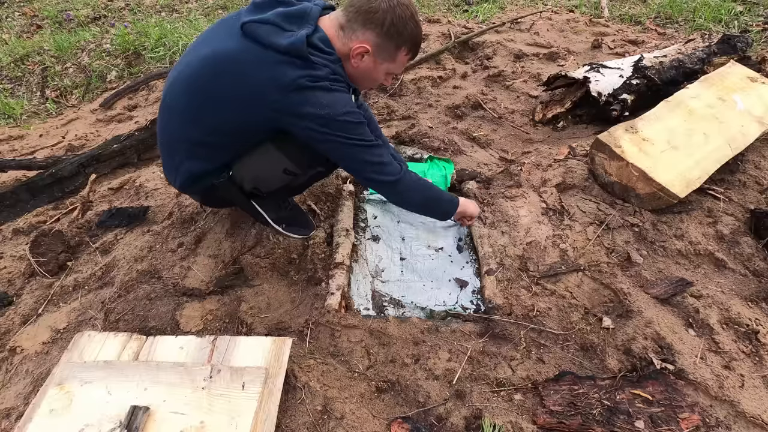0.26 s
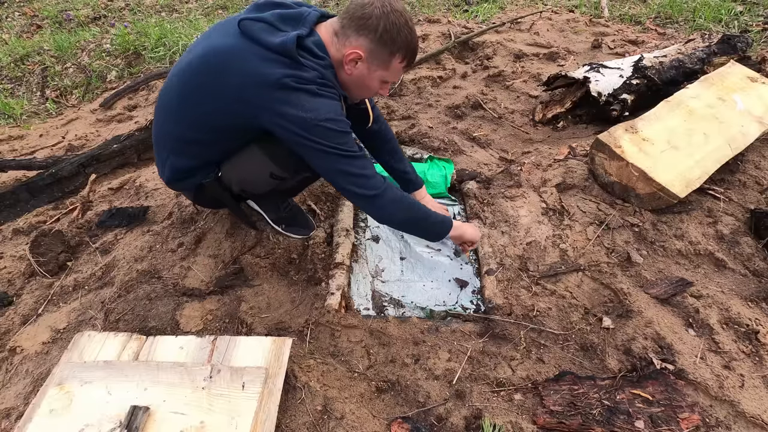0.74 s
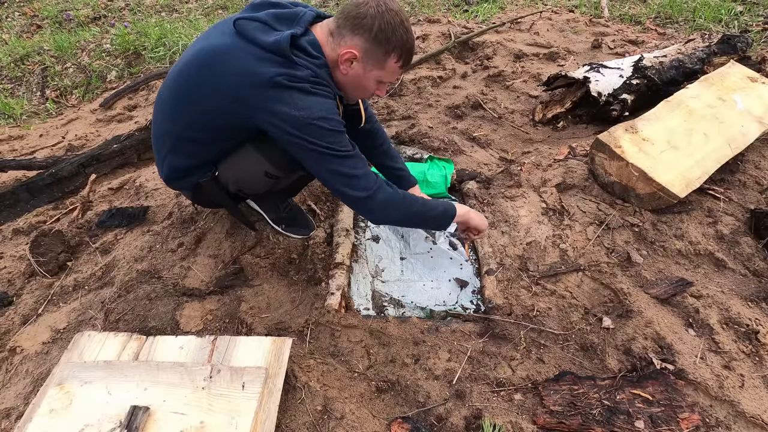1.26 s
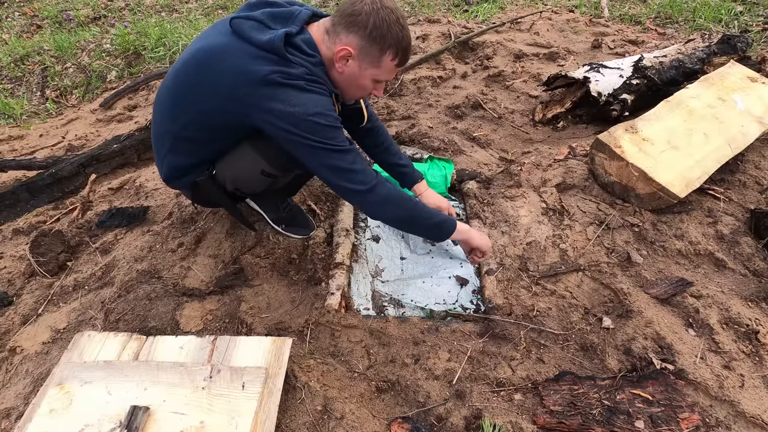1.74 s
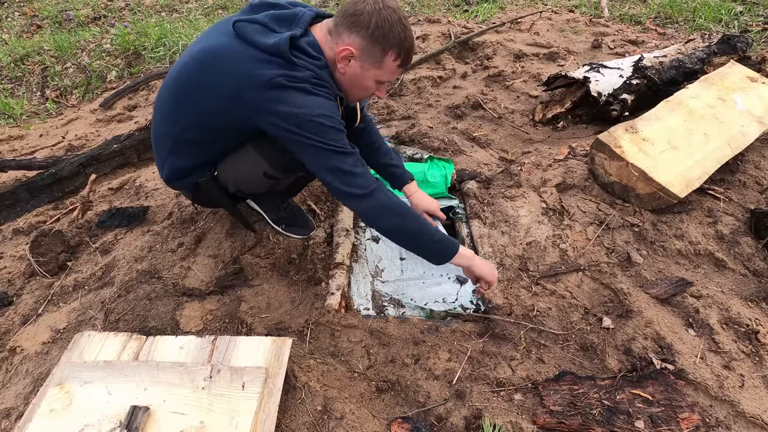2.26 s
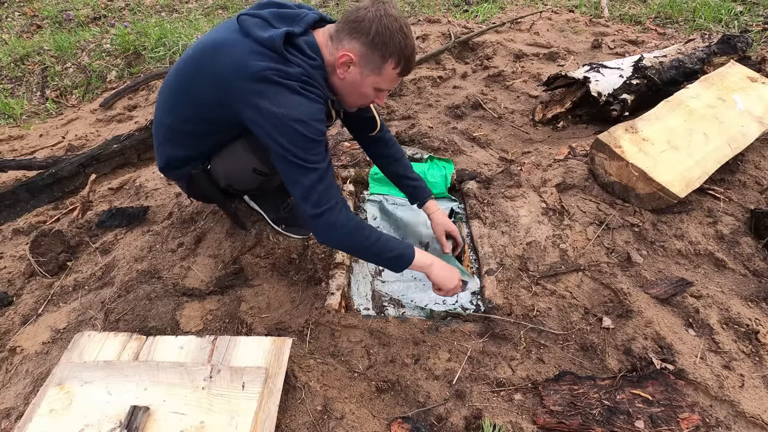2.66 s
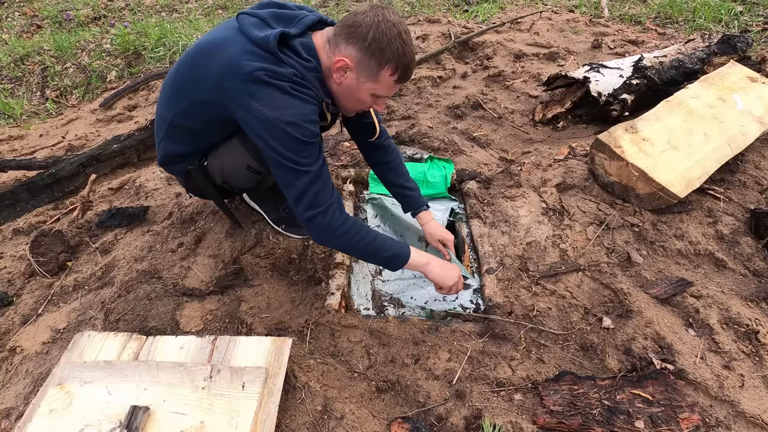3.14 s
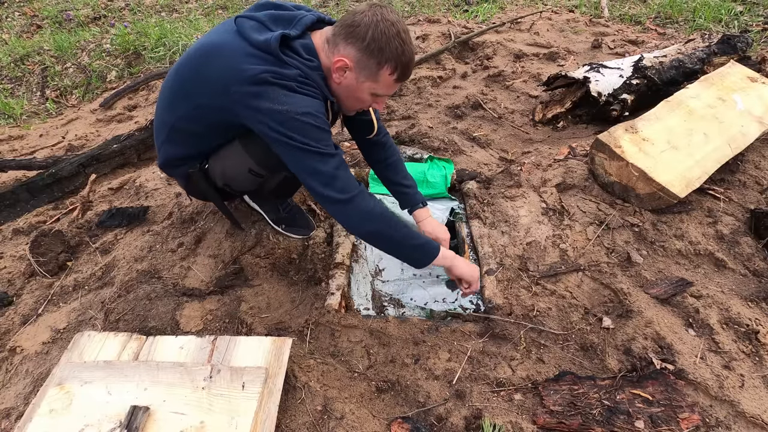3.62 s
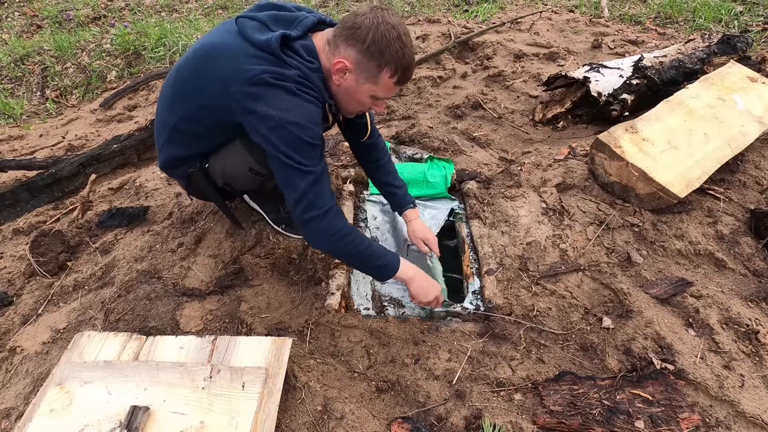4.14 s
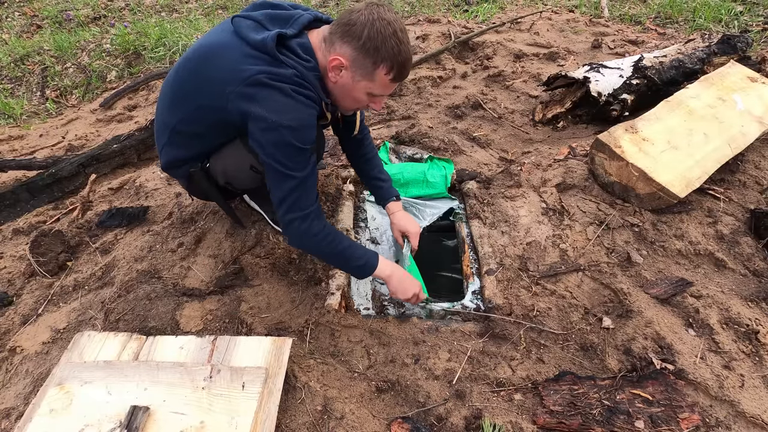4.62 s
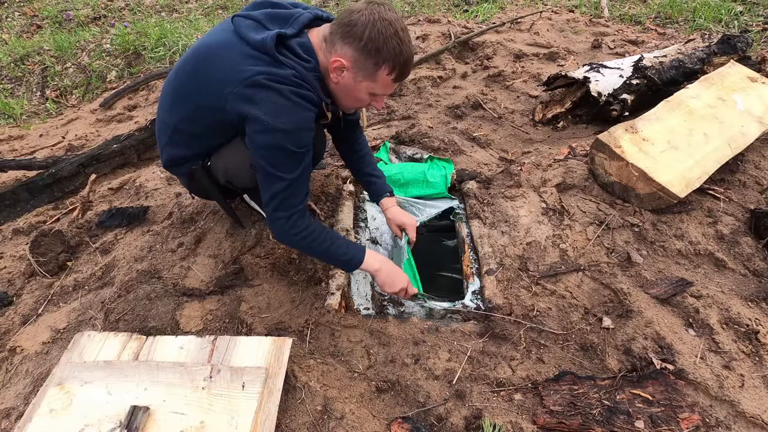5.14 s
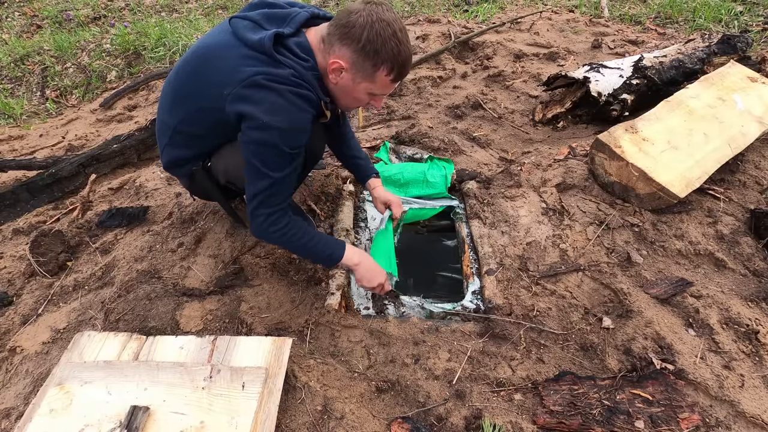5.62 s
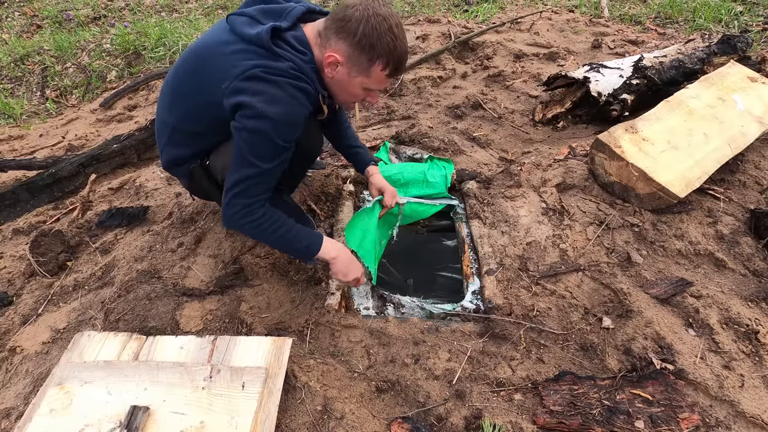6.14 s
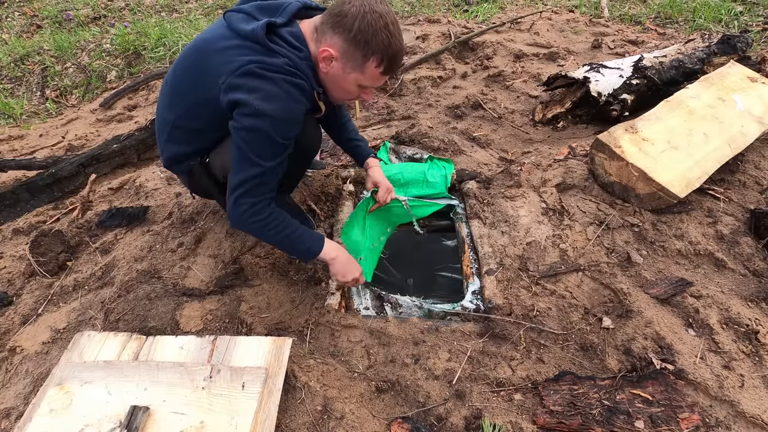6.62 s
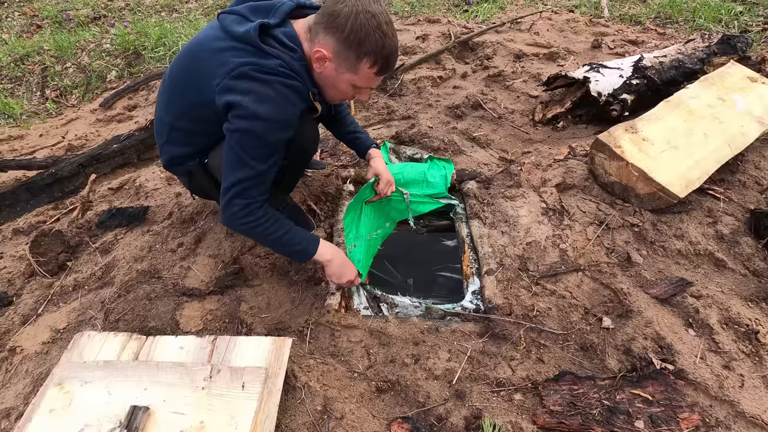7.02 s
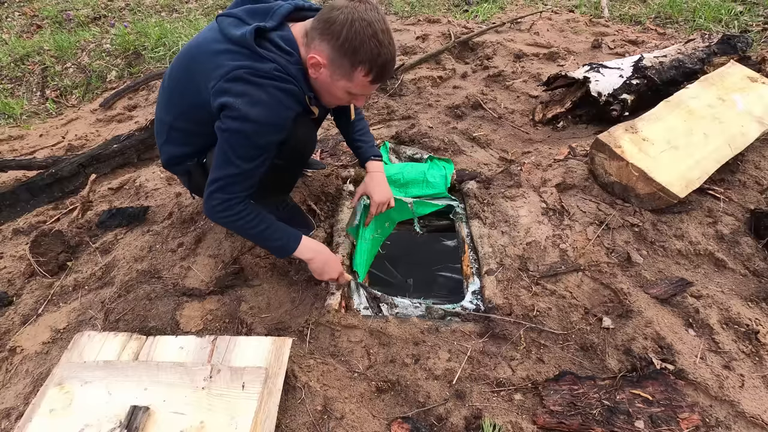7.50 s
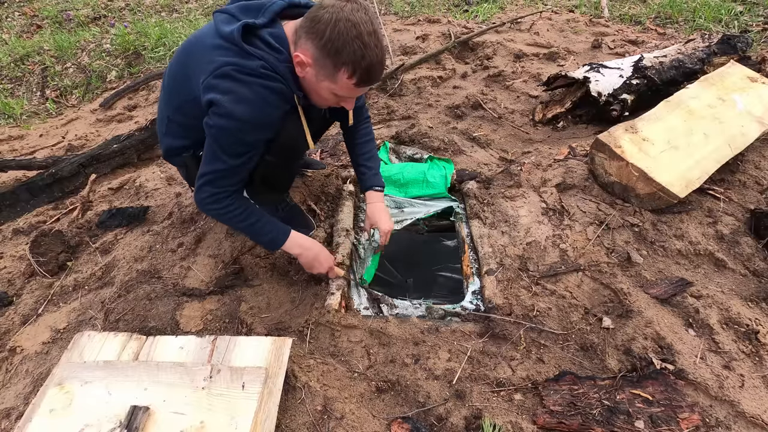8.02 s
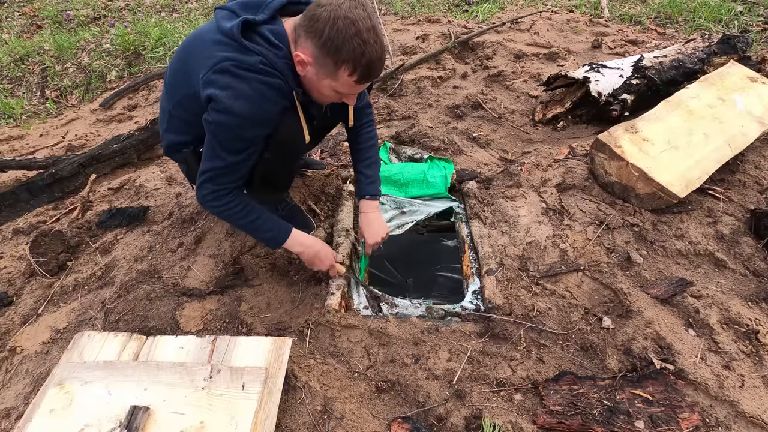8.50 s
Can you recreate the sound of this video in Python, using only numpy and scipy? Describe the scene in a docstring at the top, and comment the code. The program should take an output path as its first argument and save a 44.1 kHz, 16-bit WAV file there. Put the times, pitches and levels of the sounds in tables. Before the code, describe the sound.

Close, dry plastic handling in open air. Film creases pop singly and in clumps, the loose sheet thuds softly as it jerks taut, and the material slides with a fine hiss between pulls. It starts sparse, is loudest through the middle, and ends in steady bright rustling. Behind are wind rumble, a faint airy hush and a few thin bird whistles; stereo opens from narrow to wide.

```python
"""Outdoors at a pit in sandy ground, plastic sheeting and a bag are peeled back a step from the microphone.
Creases snap one by one, each a sharp push and a facet rattle, and jerk the loose sheet into pushing air.
Pulls of the hands crumple the film into clumps of tiny pops; between them it slides with a fine noisy rustle.
Behind lie low wind rumble on the microphone, a steady hush and a distant bird's gliding whistle."""
import sys
import numpy as np
from scipy import signal
from scipy.fft import rfft, irfft, next_fast_len
from scipy.io import wavfile
from scipy.ndimage import uniform_filter1d, map_coordinates

SR = 44100
rng = np.random.default_rng(int(sys.argv[2]) if len(sys.argv) > 2 else 0)


def master(y):
    """Save y as 16-bit WAV."""
    cut = np.clip(np.atleast_2d(y).T, -1, 1)
    pcm = np.round(cut * 32767)  # scale
    wavfile.write(sys.argv[1], SR, pcm.astype(np.int16))


N = 386316

# Single crease snaps, loud and faint: start_s, level_db, pitch_hz of the facet,
# rattle_db (against the push, before a common lift)
CREASE_SNAPS = [(0.285, -29, 6500, 19), (0.2986, -32.5, 5410, 7), (0.314, -32, 6340, 1),
                (0.376, -39, 6200, 15), (0.4731, -23, 4960, -1), (0.4803, -24, 6000, -2),
                (0.486, -20, 4400, -3), (0.5004, -17, 706, -7), (0.5337, -22, 790, -8),
                (0.541, -22, 786, -10), (0.556, -27, 4880, -2), (0.5693, -24, 4050, -7),
                (0.594, -19, 766, 4), (0.616, -20.5, 1780, -8), (0.6595, -23, 790, 5),
                (0.669, -25.5, 790, -8), (0.7409, -24, 4040, -4), (0.924, -38, 6500, 11),
                (1.0875, -36.5, 3230, -11), (1.1462, -32.5, 2390, -19), (1.272, -39, 2200, 0),
                (1.3317, -37.5, 1500, 3), (1.575, -38.5, 5000, 9), (1.7857, -29, 1590, 3),
                (2.0812, -17.5, 1720, 3.5), (2.283, -15.5, 1120, -1.5), (2.318, -15.5, 1310, -2),
                (2.3236, -20, 1220, 3), (2.3631, -18, 930, 1), (2.419, -18, 1180, -13),
                (2.4711, -13, 2670, -12), (2.4827, -14.5, 3330, -3.5), (2.5265, -17, 2500, -9),
                (2.5701, -21, 3580, -5), (2.583, -19.5, 3400, -14), (2.5913, -17, 2480, -22),
                (2.6076, -16.5, 3030, -12), (2.6379, -19.5, 760, -8.5), (2.936, -41, 2000, 5),
                (3.1596, -15.5, 1850, -8), (3.349, -37, 2820, -4), (3.459, -36.5, 1130, -2),
                (3.6341, -23.5, 3180, 13), (3.66, -18, 2410, -10), (3.678, -16, 4400, 2),
                (3.748, -16.5, 3940, -7.5), (3.794, -19.5, 4860, 11), (3.8063, -16.5, 2900, -4),
                (3.8228, -19, 4180, 4), (3.8447, -13, 1670, 10), (3.8932, -16, 3050, -17),
                (3.9004, -15.5, 1230, -6), (3.906, -17, 1330, 1), (3.9191, -17, 980, 1),
                (3.9282, -17.5, 805, 3), (3.9852, -16.5, 3000, -8), (3.9927, -20, 970, -2),
                (4.256, -21.5, 1110, -3), (4.329, -22.5, 6000, -1), (4.3957, -17.5, 1170, -2),
                (4.42, -19.5, 935, 13), (4.446, -16.5, 1210, -3), (4.4522, -19, 1810, 18),
                (4.474, -16, 990, -5), (4.4906, -17, 895, -3), (4.637, -24, 750, -5),
                (4.7245, -18.5, 1090, -3.5), (4.829, -21, 1200, 2), (4.8335, -16.5, 1960, 3),
                (5.2208, -35.5, 6000, 17), (5.2617, -31, 5000, 5), (5.2816, -13, 1450, -9),
                (5.408, -15.5, 5760, -6), (5.4325, -12, 1900, -1), (5.4543, -13, 5600, 13),
                (5.4896, -14, 810, 5), (5.5303, -13.5, 784, -2), (5.5523, -13, 835, -10),
                (5.5704, -20.5, 2630, -4), (5.5887, -14, 780, -5), (5.6376, -15, 790, -4.5),
                (5.677, -17, 3200, -4), (5.6916, -17.5, 3770, -2), (5.7246, -14.5, 3220, -4),
                (5.8811, -16.5, 760, -12), (5.8901, -17.5, 770, -11), (5.915, -21, 795, 0),
                (5.927, -20, 740, 4), (5.9369, -19.5, 750, -6), (5.9978, -22.5, 750, 0),
                (6.0904, -23.5, 755, -6), (6.1, -23, 764, -11), (6.1212, -24.5, 5900, -5),
                (6.1947, -26, 1680, 5), (6.258, -24, 1730, 19), (6.2759, -20.5, 746, 3),
                (6.5055, -31, 1730, 12), (6.5457, -24.5, 910, 9), (6.6457, -19.5, 2010, -2),
                (6.8449, -25.5, 5540, 9), (6.8844, -25, 6500, -14), (7.0064, -18.5, 5260, -3),
                (7.0115, -19.5, 1220, -1), (7.062, -26, 810, 3), (7.2774, -27.5, 2440, 15),
                (7.3327, -23, 6740, 17), (7.4204, -24.5, 1920, -3), (7.532, -32.5, 3770, -2),
                (7.6697, -31, 5940, 2), (7.8572, -28.5, 2610, 6), (8.1071, -19.5, 5040, 0)]
# Slack sheet jerked taut with a soft thump: start_s, level_db
SHEET_THUMPS = [(0.5947, -28), (0.67, -33), (2.0832, -21.5), (2.3243, -27), (2.364, -26), (2.419, -28),
                (2.471, -23.5), (3.1603, -27.5), (3.458, -38), (3.907, -24), (3.939, -20.5), (3.989, -21.5),
                (4.256, -30.5), (4.329, -25), (4.3957, -28), (4.42, -21), (4.453, -16.5), (4.4916, -19.5),
                (4.637, -23.5), (4.831, -24), (5.2823, -29), (5.4894, -29), (5.5296, -23), (5.6377, -24),
                (5.6916, -27.5), (5.8832, -30), (7.0057, -20.5), (7.277, -37.5), (7.334, -43)]
# Pulls of the hands: start_s, length_s, crackle_db, folds_db (hollow body, relative to crackle_db), air_db;
# crackle() then trims crackle and folds, each by its own amount
HAND_PULLS = [(0.0, 0.018, -45, -3, -66), (0.106, 0.029, -50.5, -1, -70), (0.271, 0.057, -40.5, -2, -44.5),
              (0.451, 0.042, -33.5, -6.5, -53), (0.524, 0.036, -30.5, 2.5, -50),
              (0.585, 0.036, -26.5, -2.5, -35), (0.635, 0.033, -32.5, 1, -37.5),
              (0.714, 0.022, -31, -3, -46), (0.78, 0.026, -32, -7.5, -42), (1.077, 0.088, -39, -0.5, -44),
              (1.225, 0.13, -49, 0.5, -54), (1.832, 0.12, -45.5, -2, -42.5), (2.048, .045, -38, -2.5, -48),
              (2.163, 0.037, -38, -6, -46), (2.256, 0.16, -36.5, -3, -36), (2.392, 0.085, -36.5, -6, -49),
              (2.583, 0.056, -25.5, -4.5, -37.5), (2.507, 0.058, -46, -17, -43),
              (2.98, 0.17, -51.5, -1.5, -54), (3.576, 0.11, -49, -21, -47), (3.725, 0.022, -46, -10, -51),
              (3.668, 0.06, -38, -6.5, -37.5), (3.782, 0.078, -35, -6, -37),
              (3.888, 0.066, -26.5, -4, -31.5), (3.977, 0.025, -36, 7.5, -35), (4.055, 0.32, -48, -1, -41),
              (4.39, .06, -32.5, -0.5, -34), (4.461, 0.036, -27.5, -0.5, -27),
              (4.56, 0.035, -40.5, -21, -47), (4.829, 0.013, -43.5, 5, -34), (5.272, 0.038, -46.5, -3, -35),
              (5.4, 0.14, -31.5, -5.5, -32.5), (5.518, 0.064, -26.5, -7.5, -33),
              (5.678, 0.0083, -24, 0, -27), (5.725, 0.0072, -29.5, 6.5, -36), (5.859, 0.11, -30, -1, -37),
              (6.08, 0.047, -30.5, -1.5, -53), (6.266, 0.026, -34.5, -4, -40.5),
              (6.521, 0.048, -41, -5, -48), (6.619, 0.055, -29.5, -3, -45), (6.82, 0.1, -32, -3, -43),
              (6.954, 0.07, -34, -5, -45), (7.001, 0.071, -33.5, -5.5, -40), (7.182, .02, -38, -15, -52),
              (7.292, 0.082, -43.5, -19, -44), (7.597, 0.11, -38, -7.5, -61),
              (7.849, 0.041, -35.5, -13.5, -47), (7.973, 0.053, -37.5, -12, -51),
              (8.08, 0.077, -35.5, -8.5, -50), (8.311, 0.087, -37, -14, -61)]
# Film sliding over itself and the sand, before the trims in slide(): time_s, level_db
SLIDE_LEVEL = [(0, -57.5), (0.4, -59), (0.9, -51.5), (1.4, -53.5), (1.72, -52.5), (2.05, -53.5),
               (2.8, -46.5), (3.1, -48), (3.28, -54.5), (3.57, -67), (4.0, -44.5), (4.8, -46.5),
               (5.15, -49.5), (5.36, -50.5), (5.8, -44), (6.42, -56.5), (7.15, -50.5), (7.7, -41.5),
               (8.2, -37.5), (8.76, -43.5)]
# Wind on the microphone, before gusts: time_s, level_db
WIND_LEVEL = [(0, -64), (0.9, -49), (2.0, -48.5), (3.1, -49.5), (4.2, -50), (5.0, -52), (6.3, -51),
              (7.7, -48), (8.76, -48)]
# Bird whistles: start_s, level_db (added to the note's own level)
BIRD_WHISTLES = [(2.73, -55), (2.995, -51), (3.27, -50), (8.61, -49)]
# The note swoops down, climbs back and holds: time_s from its start, pitch_hz, level_db
BIRD_NOTE = [(0, 5500, -12), (.03, 3800, -5), (.07, 2700, -9), (.09, 3650, -11), (.11, 3850, -7),
             (.134, 4080, 2), (.16, 4260, -6), (.3, 4260, -8)]

# Relative spectra, each: frequency_hz, density_db per Hz
CREASE_SPECTRUM = [(60, -24), (300, -1.5), (600, -7), (1100, 0), (1700, -2.5), (2400, 0.5), (3300, -5),
                   (5400, -6), (6500, -14), (8000, -20.5), (12000, -28.5), (15500, -34)]  # a snapping facet
FLAP_SPECTRUM = [(15, -10), (40, -2), (110, 4), (190, 0), (300, -16.5), (700, -22), (2000, -108)]  # air pushed by the loose sheet
FILM_SPECTRUM = [(500, -9.5), (900, -8), (1200, 2.5), (1700, 0.5), (2400, 1), (3300, -2), (5400, -5),
                 (6500, -11), (8000, -15.5), (12000, -32.5), (15500, -53)]  # crumpling film
FOLDS_SPECTRUM = [(50, -24.5), (130, 2.5), (330, 2), (600, 1.5), (950, -0.5), (1300, 3.5), (2500, -62.5)]  # hollow body of the folds
RUSTLE_SPECTRUM = [(150, -31), (330, -14.5), (550, -21), (850, -14.5), (1200, 2), (1700, 3), (2300, 4.5),
                   (3300, -0.5), (5400, -1.5), (6800, -11), (8500, -22.5), (12000, -28.5), (15500, -35)]  # light sliding
RUMBLE_SPECTRUM = [(12, 3), (20, 10), (38, 7.5), (70, 2.5), (111, -5), (184, -8.5), (290, -43)]  # wind and moved air on the microphone
OUTDOORS_SPECTRUM = [(60, 8), (200, -3), (380, -11.5), (750, -29.5), (1050, -20), (2300, -45), (3300, -26),
                     (5300, -17.5), (8200, -23.5), (15000, -84)]  # hush of open country

# Gain on the plastic's highest treble: time_s, gain_db
TREBLE_SHEEN = [(0, 2), (1.4, -7), (2.5, -1.5), (3.4, -3), (5.5, 5), (8, 7)]
# Breadth of the stereo image: time_s, width (0 mono to 1 full)
STEREO_WIDTH = [(0, 0.05), (1.3, 0.012), (1.8, 0.28), (3, 0.96), (5, 1)]
# The two microphone ports: frequency_hz, right_lead_rad, left_minus_right_db
MIC_PORTS = [(200, 0, 0), (700, .1, -1.5), (2400, .5, 0), (5500, 1.15, 0), (7200, 2.6, 0), (9500, 2.2, -7),
             (15000, 2.8, -7.5)]

TOP_HZ = 16100  # nothing is heard above this
PULL_ATTACK_S, PULL_RELEASE_DB_PER_S = 0.0057, 640  # a pull takes hold quickly, then the creases settle
BILLOW_RELEASE_DB_PER_S = 105  # the sheet sinks slowly after a pull
FLAP_DB = -18  # air pushed by a snap, relative to the snap
SLIDE_BODY_DB = -9  # offset of the folds under a light slide, against its level before the trim
GUST_DB = 0.5  # swing of the gusts


def snaps(facet_db=7.5, damped_below_hz=1100, facet_octaves=0.49, rattle_t60=0.03, rattle_lift_db=2,
          span_s=0.0047, size=2048):
    """A crease buckles with one sharp push; the facets around it rattle for a few milliseconds."""
    out = np.zeros((2, N))
    t = np.arange(size) / SR
    for start_s, level_db, pitch_hz, rattle_db in CREASE_SNAPS:
        # broad, low facets ring less
        boost_db = facet_db * pitch_hz / np.hypot(pitch_hz, damped_below_hz)
        body = facet(CREASE_SPECTRUM, pitch_hz, boost_db, facet_octaves)
        rattle_shape = amp(-60 * t / rattle_t60) * (1 - np.exp(-t / 0.00054))
        rattle = rng.standard_normal((2, size)) * rattle_shape
        rattle = signal.fftconvolve(rattle, body[None], axes=1)[:, :size]
        pair = amp(rattle_db + rattle_lift_db) * rattle / np.linalg.norm(rattle[0])
        pair[0] += rng.choice([-1, 1]) * body  # it buckles towards or away from the listener
        # level_db is the rms over span_s
        gain = amp(level_db) * np.sqrt(span_s * SR)
        add(out, start_s, pair / np.linalg.norm(pair[0]) * gain)
    return spread(out, apart_hz=7000)


def flaps(flutter_t60=0.094, flutter=0.096, span_s=0.0054, size=8192):
    """Each snap or thump jerks the loose sheet, which pushes air and flutters briefly."""
    out = np.zeros(N)
    t = np.arange(size) / SR
    sheet = ring(lambda hz: along(FLAP_SPECTRUM, hz), size=size)
    snap_jerks = [(start_s, level_db + FLAP_DB) for start_s, level_db, *_ in CREASE_SNAPS]
    for start_s, level_db in snap_jerks + list(SHEET_THUMPS):
        jerk = flutter * rng.standard_normal(size) * amp(-60 * t / flutter_t60)
        jerk[0] += rng.choice([-1, 1])
        push = signal.fftconvolve(jerk, sheet)[:size]
        # level_db is the rms over span_s
        gain = amp(level_db) * np.sqrt(span_s * SR)
        add(out, start_s, push / np.linalg.norm(push) * gain)
    return out


def crackle(grains_per_s=110, scatter_db=4.0, rub=0.45, clump_db=3.0, facet_db=6, rattle_t60=0.021,
            rattle=0.17, film_db=-1.5, fold_db=-1):
    """In a pull tiny wrinkles pop in clumps over the rub of film on film, and sound the hollow folds."""
    t = np.arange(SR // 50) / SR
    film, folds = np.zeros((2, N)), np.zeros((2, N))
    for pitch_hz in np.geomspace(1100, 6000, 6):  # broad wrinkles sound low, fine ones high
        after = rattle * rng.standard_normal((2, len(t))) * amp(-60 * t / rattle_t60)
        after[0, 0] += 1  # the pop itself
        grains = pops(grains_per_s, scatter_db)
        wrinkles = unit(signal.oaconvolve(grains[None], after, axes=1)[:, :N])
        rubbing = rub * rng.standard_normal((2, N))
        drive = (wrinkles + rubbing) * amp(clump_db * wobble(60))
        body = facet(FILM_SPECTRUM, pitch_hz, facet_db, octaves=0.26, ripple_db=1.0)
        film += signal.oaconvolve(drive, body[None], axes=1)[:, :N]
        folds += drive
    film = unit(spread(film, apart_hz=6900))
    folds = unit(spread(through(folds, FOLDS_SPECTRUM), apart_hz=5500))
    _, _, crackle_db, body_db, _ = np.transpose(HAND_PULLS)
    film_gain = amp(film_db) * pull_gain(crackle_db, PULL_RELEASE_DB_PER_S)
    fold_gain = amp(fold_db) * pull_gain(crackle_db + body_db, PULL_RELEASE_DB_PER_S)
    return patchy(film_gain * film + fold_gain * folds, depth_db=2.0)


def slide(grains_per_s=320, rub=1.0, uneven_db=2.0, trim_db=-1.2, ticks_per_s=35, tick_db=-3,
          tick_t60=0.023, body_grows=0.44, light_db=-50):
    """Sliding film gives a dense fine rustle and stray ticks; a firmer slide has relatively less of the folds."""
    level_db, = curves(SLIDE_LEVEL)
    grains = np.array([pops(grains_per_s, scatter_db=2.5), pops(grains_per_s, scatter_db=3.5)])
    drive = unit(grains) + rub * rng.standard_normal((2, N))
    drive = drive * amp(uneven_db * (wobble(14) + wobble(70)))
    # each tick is a brief scratch: noise under a decaying power envelope
    t = np.arange(SR // 50) / SR
    chatter = rng.standard_normal((2, len(t))) * amp(-60 * t / tick_t60)
    tick_pushes = pops(ticks_per_s, scatter_db=5.5)
    tick_power = signal.oaconvolve(tick_pushes[None] ** 2, chatter ** 2, axes=1)[:, :N]
    ticks = unit(np.sqrt(np.abs(tick_power)) * rng.standard_normal((2, N)))
    rustle = through(drive + amp(tick_db) * ticks, RUSTLE_SPECTRUM)
    rustle = amp(level_db + trim_db) * unit(spread(rustle, apart_hz=5600))
    # the folds grow more slowly than the rustle
    body_db = light_db + body_grows * (level_db - light_db) + SLIDE_BODY_DB
    folds = amp(body_db) * unit(spread(through(drive, FOLDS_SPECTRUM), apart_hz=5640))
    return patchy(rustle + folds, depth_db=1.5)


def facet(spectrum, pitch_hz, boost_db, octaves, ripple_db=3, ripple_hz=450, bending=.2):
    """Impulse response of one stiff facet of film: a main resonance and chance side modes."""
    def colour(hz):
        knots = rng.standard_normal(size=128)
        ripple = ripple_db * map_coordinates(knots, [hz / ripple_hz], mode="mirror")
        peak = boost_db * np.exp(-.5 * (np.log2((hz + 1) / pitch_hz) / octaves) ** 2)
        return along(spectrum, hz) + peak + ripple

    h = ring(colour)
    # bending waves disperse: the low notes leave the film slightly later
    hz = np.fft.rfftfreq(len(h), 1 / SR)
    return irfft(rfft(h) * np.exp(-1j * bending * np.sqrt(hz)))


def pops(per_s, scatter_db):
    """Single pushes at random moments, most small and a few large."""
    sizes = amp(scatter_db * np.minimum(rng.exponential(size=N), 3.5))
    return (rng.random(N) < per_s / SR) * sizes * rng.choice([-1, 1], N)


def pull_gain(levels_db, release_db_per_s):
    """Envelope of all pulls: each rises to its level, holds and dies away."""
    t = np.arange(SR) / SR
    power = np.zeros(N)
    for (start_s, length_s, *_), level_db in zip(HAND_PULLS, levels_db):
        rise = np.minimum(t / PULL_ATTACK_S, 1)
        fall_db = release_db_per_s * np.maximum(t - length_s, 0)
        add(power, start_s, (rise * amp(level_db - fall_db)) ** 2)
    return np.sqrt(power)


def patchy(x, depth_db, size=512):
    """Folds open and close, so the colour shifts from moment to moment."""
    z = signal.stft(x, nperseg=size)[2]
    field = rng.standard_normal(z.shape[1:])
    field = uniform_filter1d(field, size=7, axis=0)  # smooth over frequency
    field = uniform_filter1d(field, size=7, axis=1)  # smooth over time
    return signal.istft(z * amp(depth_db * unit(field)), nperseg=size)[1][:, :N]


def surroundings(x, t60=0.17, wet_db=-22):
    """Ground and trees scatter back a faint, short tail."""
    t = np.arange(SR // 3) / SR
    tail = rng.standard_normal((2, len(t))) * amp(-60 * t / t60) * (1 - np.exp(-t / 0.00072))
    return amp(wet_db) * signal.fftconvolve(x, tail / np.linalg.norm(tail[0]), axes=1)[:, :N]


def rumble(port_db=-14):
    """Wind and the billowing sheet buffet the microphone with low-frequency eddies."""
    billow = pull_gain([air_db for *_, air_db in HAND_PULLS], BILLOW_RELEASE_DB_PER_S)
    wind = amp(curves(WIND_LEVEL)[0] + GUST_DB * wobble(3.5))
    # a small part of the eddies is each port's own
    eddies = rng.standard_normal(N) + amp(port_db) * rng.standard_normal((2, N))
    buffeting = unit(filtered(eddies, lambda hz: amp(along(RUMBLE_SPECTRUM, hz))))
    return np.hypot(billow, wind) * buffeting


def hush(level_db=-56):
    """Open country gives a steady coloured noise, wide in the treble."""
    noise = spread(rng.standard_normal((2, N)), apart_hz=4970)
    return amp(level_db) * unit(filtered(noise, lambda hz: amp(along(OUTDOORS_SPECTRUM, hz))))


def bird(waver=0.0086, flicker_db=3, foliage_t60=0.17, foliage_db=-9):
    """A far, thin whistle that repeats one note, wavering and blurred by the trees."""
    out = np.zeros(N)
    t = np.arange(N) / SR
    pitch_hz, note_db = curves(BIRD_NOTE)
    note_end_s = BIRD_NOTE[-1][0]
    gate = np.clip(np.minimum(t, note_end_s - t) / .01, 0, 1)  # 10 ms fades
    for start_s, level_db in BIRD_WHISTLES:
        phase = 2 * np.pi * np.cumsum(pitch_hz * (1 + waver * wobble(258))) / SR
        gain = gate * amp(note_db + level_db + flicker_db * wobble(82))
        add(out, start_s, gain * np.sin(phase))
    return out + surroundings(out[None], t60=foliage_t60, wet_db=foliage_db)


def amp(db):
    """Decibels to gain."""
    return 10 ** (np.asarray(db) / 20)


def unit(x):
    """x at rms 1."""
    return x / np.sqrt(np.mean(x ** 2) + 1e-20)


def along(points, hz):
    """(Hz, value) points read on a log axis."""
    f, v = np.transpose(points)
    return np.interp(np.log(hz + 1), np.log(f + 1), v)


def curves(rows):
    """One value per sample for each column after the time."""
    s, *cols = np.transpose(rows)
    return [np.interp(np.arange(N) / SR, s, c) for c in cols]


def wobble(rate):
    """A smooth random curve, rate knots a second."""
    knots = rng.standard_normal(int(N * rate / SR) + 4)
    return map_coordinates(knots, [np.arange(N) * rate / SR])


def filtered(x, response):
    """x times a complex response of frequency."""
    m = next_fast_len(N + SR // 2)
    return irfft(rfft(x, m) * response(np.fft.rfftfreq(m, 1 / SR)), m)[..., :N]


def ring(colour, size=2048):
    """Causal impulse response, energy 1, of a colour given in dB as a function of Hz."""
    # folding the cepstrum forward in time gives minimum phase
    cepstrum = irfft(np.log(amp(colour(np.fft.rfftfreq(size, 1 / SR)))))
    cepstrum[1:size // 2] *= 2
    cepstrum[size // 2 + 1:] = 0
    h = irfft(np.exp(rfft(cepstrum)))
    return h / np.linalg.norm(h)


def through(x, spectrum):
    """Stereo x rung through a fixed spectrum."""
    return signal.fftconvolve(x, ring(lambda hz: along(spectrum, hz))[None], axes=1)[:, :N]


def add(track, start_s, sound):
    """Mix a sound into the track at start_s."""
    part = track[..., max(round(start_s * SR), 0):][..., :sound.shape[-1]]
    part += sound[..., :part.shape[-1]]


def spread(pair, apart_hz):
    """Two unrelated signals to left and right: alike in the bass, unrelated in the treble."""
    def mid_side(hz):
        turn = np.pi / 4 * hz / np.hypot(hz, apart_hz)
        return np.array([np.cos(turn), np.sin(turn)])

    mid, side = filtered(pair, mid_side)
    return np.array([mid + side, mid - side])


def scene(sheen_hz=8000):
    """The plastic with its faint echo, the flapping, the air and the bird."""
    plastic = snaps() + crackle() + slide()
    sheen_db, = curves(TREBLE_SHEEN)
    treble = filtered(plastic, lambda hz: 1 - 1 / (1 + (hz / sheen_hz) ** 20))
    plastic = plastic + (amp(sheen_db) - 1) * treble
    return plastic + surroundings(plastic) + flaps() + rumble() + hush() + bird()


def record(dry):
    """The right port hears earlier and brighter; a narrow image opens, peaks clip and the top is cut off."""
    width, = curves(STEREO_WIDTH)
    table = np.array(MIC_PORTS)
    lead, balance = table[:, :2], table[:, ::2]
    sides = np.array([[.5], [-.5]])  # left, right: each takes half the difference
    ports = filtered(dry, lambda hz: np.exp(-1j * along(lead, hz) * sides))
    image = width * ports + (1 - width) * dry[0]
    image = filtered(image, lambda hz: amp(along(balance, hz) * sides))
    return filtered(np.clip(image, -1, 1), lambda hz: hz < TOP_HZ)


dry = scene()
out = record(dry)
master(out)
```